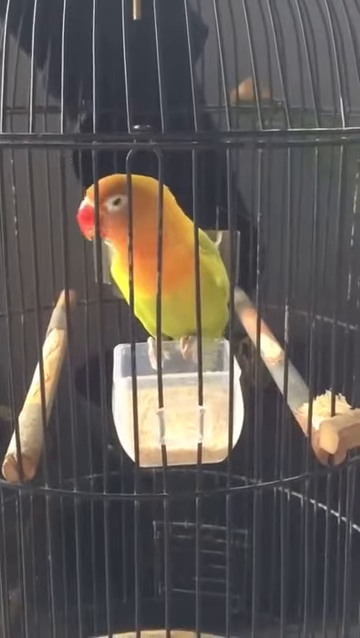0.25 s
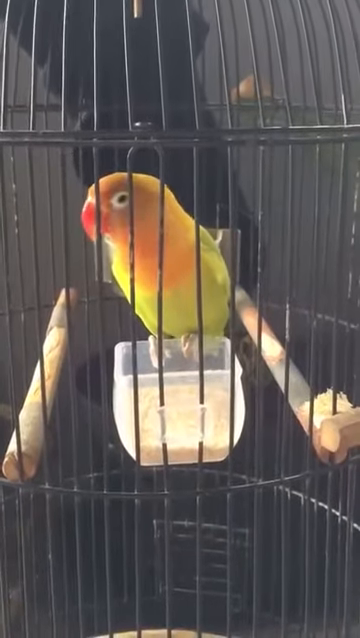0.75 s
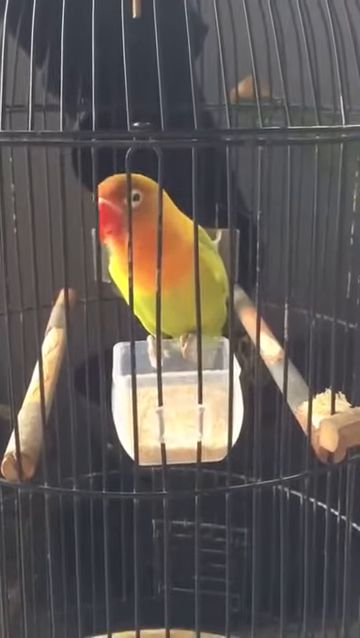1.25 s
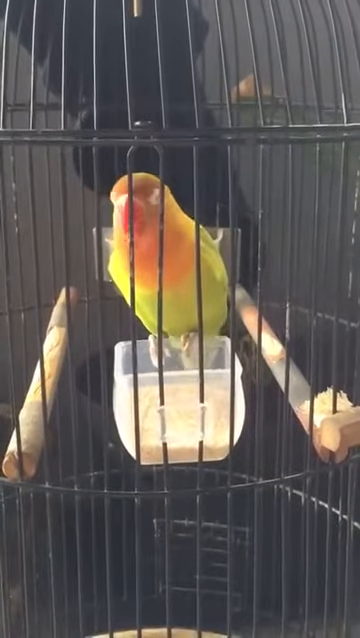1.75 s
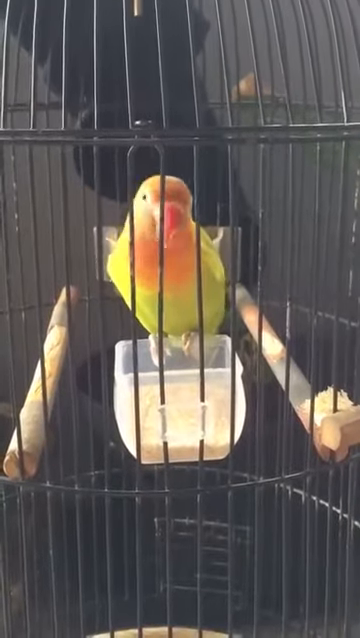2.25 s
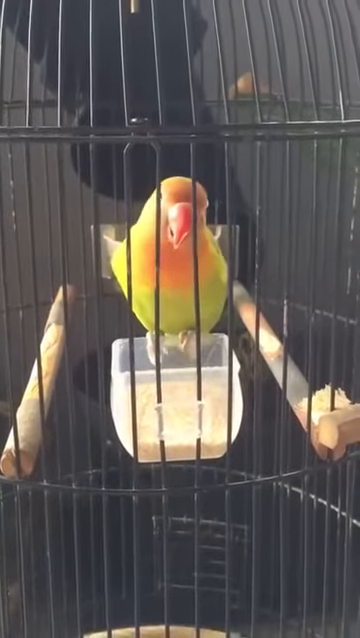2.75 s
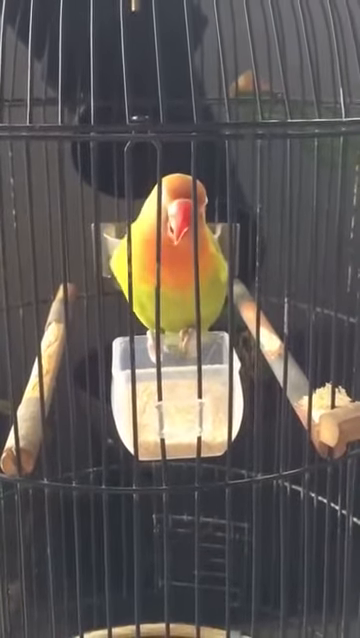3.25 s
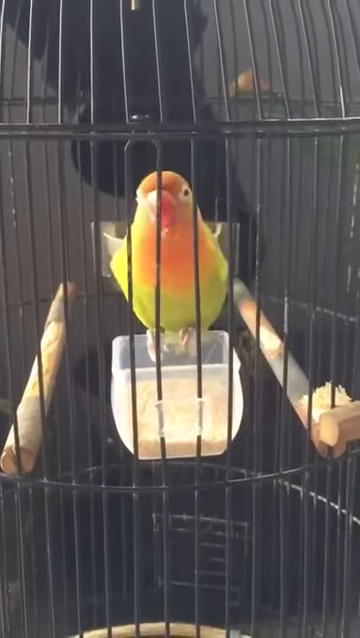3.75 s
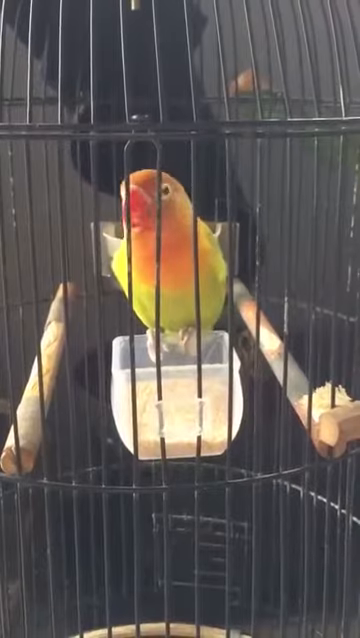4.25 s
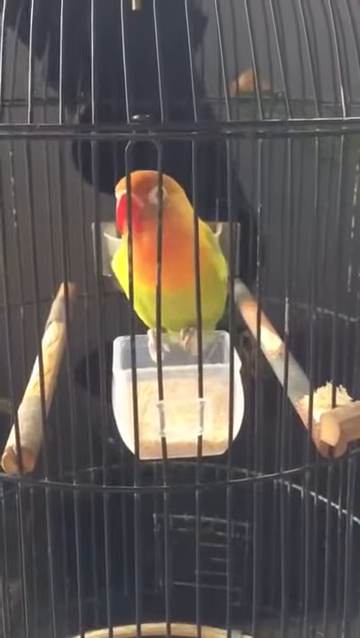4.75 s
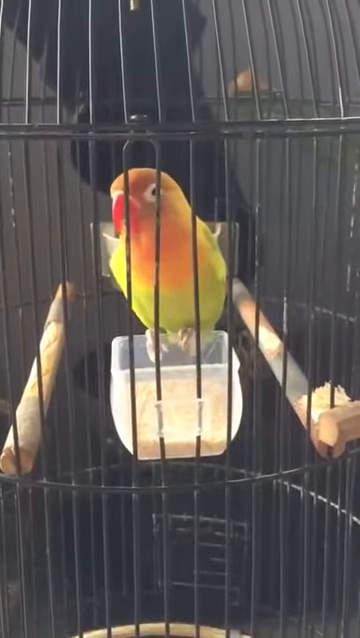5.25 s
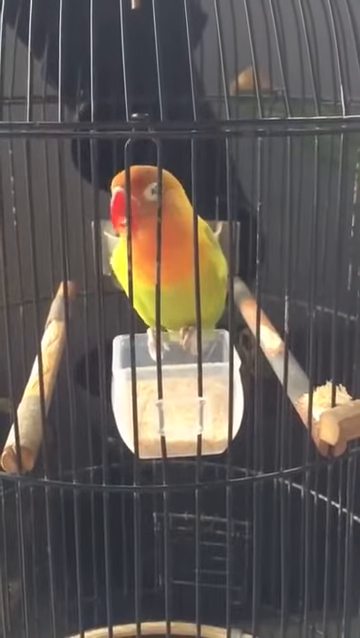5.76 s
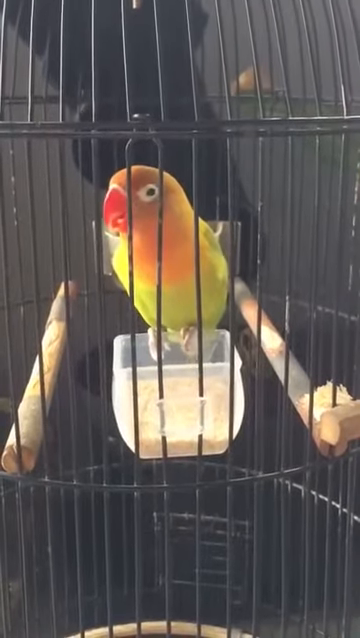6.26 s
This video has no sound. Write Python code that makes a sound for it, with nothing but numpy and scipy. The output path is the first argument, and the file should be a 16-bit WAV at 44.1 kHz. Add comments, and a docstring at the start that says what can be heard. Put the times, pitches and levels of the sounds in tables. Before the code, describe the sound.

A lovebird sings loud, high chirps close by, quickening into two-part notes, thinning to dry ticks and ending in harsh chatter.

```python
"""High, loud chirps from a lovebird in a wire cage, close up in a small room. They quicken into two-part
notes, thin out to dry ticks and end in harsh chatter. Each syllable is a vibrating membrane heard through
the throat: a lead note, a rough pitch break, then a main note. Under the song lie room noise, a faint hum,
a far bird and one soft scuff; the loudest notes overload the microphone."""
import sys
import numpy as np
from scipy import signal
from scipy.fft import rfft, irfft, next_fast_len
from scipy.io import wavfile
from scipy.ndimage import uniform_filter1d, minimum_filter1d, map_coordinates

SR = 44100
rng = np.random.default_rng(int(sys.argv[2]) if len(sys.argv) > 2 else 0)


def generate_wav(signal):
    """Clip the signal to [-1, 1] and save it as 16-bit WAV at the path in sys.argv[1]."""
    frames = np.transpose(np.atleast_2d(signal))
    scaled = np.clip(frames, -1, 1) * 32767
    pcm = np.round(scaled).astype(np.int16)
    wavfile.write(sys.argv[1], SR, pcm)


N = 287091

# Turbulence ringing in the windpipe and bill. Each row: frequency in Hz, relative level in dB.
BREATH_SPECTRUM = [(500, -27.5), (1000, -18.5), (1650, -21), (2200, 0), (3200, -3.5), (4000, -0.5),
                   (5500, -1.5), (7400, -13), (8300, 2), (9100, -12.5), (10200, 3.5), (11400, -21),
                   (12700, 3.5), (14000, 0.5), (15500, -15)]


def amp(db):
    """Decibels to gain."""
    return 10 ** (np.asarray(db) / 20)


def unit(x):
    """Scale to rms 1."""
    return x / np.sqrt(np.mean(x ** 2) + 1e-20)


def along(points, hz):
    """Read (Hz, value) points on a log frequency axis."""
    f, v = np.transpose(points)
    return np.interp(np.log(hz + 1), np.log(f + 1), v)


def filtered(x, response):
    """Equalise x with a gain given as a function of Hz."""
    m = next_fast_len(len(x) + 4096)
    return irfft(rfft(x, m) * response(np.fft.rfftfreq(m, 1 / SR)), m)[:len(x)]


def noise(spectrum, size):
    """Coloured noise of rms 1."""
    return unit(filtered(rng.standard_normal(size), lambda hz: amp(along(spectrum, hz))))


def wobble(rate, size):
    """A smooth random curve, rate knots a second."""
    return map_coordinates(rng.standard_normal(int(size * rate / SR) + 4), [np.arange(size) * rate / SR])


def add(track, s, x):
    """Mix x into the track at s seconds."""
    part = track[max(round(s * SR), 0):][:len(x)]
    part += x[:len(part)]


def drift(s, notes, first, last):
    """The value at time s of a steady drift from a phrase's first note to its last."""
    return np.interp(s, [notes[0][0], notes[-1][0]], [first, last])


def glide(hz, semitones):
    """Middle and end pitch of a note that slides through hz."""
    return hz * 2 ** (np.array([-.5, .5]) * semitones / 12)


def room(x, wet_db=-14, walls_db=-7, reflections=12):
    """Direct sound, early reflections from cage and wall, and a short diffuse tail."""
    # Reverb decay. Each row: frequency in Hz, seconds to fall 60 dB.
    decay = [(300, 0.081), (3000, 0.55), (6000, 0.43), (14000, 0.38)]
    # The bill aims its treble past the microphone, so the room answers brighter than the direct sound.
    # Each row: frequency in Hz, gain in dB.
    colour = [(1500, 2), (4000, 2), (6500, 0.5), (9000, 3.5), (10300, 4.5), (12500, 1), (14000, -2.5),
              (15500, -9)]
    hz, t, spectra = signal.stft(rng.standard_normal(SR * 3 // 5), SR, nperseg=256)
    tail_db = along(colour, hz)[:, None] - 60 * t / along(decay, hz)[:, None]
    tail = signal.istft(spectra * amp(tail_db), SR, nperseg=256)[1]
    response = amp(wet_db) * tail / np.linalg.norm(tail)
    delays = (np.geomspace(.0004, .012, reflections) * rng.uniform(.7, 1, reflections) * SR).astype(int)
    response[delays] += amp(walls_db) * rng.choice([-1, 1], reflections) / np.sqrt(reflections)
    response[0] += 1
    return signal.fftconvolve(x, response)


def room_tone(hum_trim_db=-2, hum_waver_db=3.5):
    """Low room noise and an unsteady hum swell and sink together."""
    # Fader ride of the room noise. Each row: time in seconds, level in dB.
    ride = [(0, -63.5), (2.4, -65), (3.3, -69.5), (4.2, -62.5), (5, -54.5), (6.5, -53.5)]
    # Hum tones and noise colour. Each row: frequency in Hz, relative level in dB.
    hum_tones = [(59.2, -58.5), (156.1, -60.5)]
    air_spectrum = [(20, -10), (70, -3), (170, -5), (320, -18.5), (1500, -21), (8000, -30.5),
                    (15000, -25.5)]
    t = np.arange(N) / SR
    level_db = np.interp(t, *np.transpose(ride))
    hum = np.zeros(N)
    for hz, db in hum_tones:
        peak = np.sqrt(2) * amp(db + hum_waver_db * wobble(4.5, N))
        hum += peak * np.sin(2 * np.pi * hz * t + .5 * wobble(6.1, N))
    return amp(level_db) * noise(air_spectrum, N) + amp(level_db - level_db.max() + hum_trim_db) * hum


def scuff(start=5.372, level_db=-37, rise_s=.0017, t60=.36):
    """A soft, dull scuff: a burst of dark noise that dies away."""
    # The scuff's colour. Each row: frequency in Hz, relative level in dB.
    spectrum = [(150, -15), (450, 0), (1200, -5), (3000, -51)]
    out, t = np.zeros(N), np.arange(SR // 2) / SR
    envelope = amp(level_db - 60 * t / t60) * (1 - np.exp(-t / rise_s))
    add(out, start, envelope * noise(spectrum, len(t)))
    return out


def far_bird(wet_db=7, waver=.05):
    """Strongly wavering glides, heard mostly through the room."""
    # Whistles. Each row: start and length in seconds, first and last pitch in Hz, level in dB.
    calls = [(1.07, 0.084, 3640, 3120, -42.5), (1.115, 0.11, 2766, 2395, -41),
             (5.544, .17, 1328, 1670, -47.5), (5.644, 0.068, 3100, 3440, -40.5)]
    out = np.zeros(N)
    for s, length, start_hz, end_hz, db in calls:
        size = int(length * SR)
        pitch = np.linspace(start_hz, end_hz, size) * (1 + waver * wobble(277, size))
        whistle = np.hanning(size) * np.sin(2 * np.pi * np.cumsum(pitch) / SR)
        add(out, s, room(amp(db - wet_db) * whistle, wet_db))
    return out


def chirp_tail(gain_db=1):
    """The room still rings from a chirp sung just before the scene opens."""
    _, chirp = next(chirps())
    out = np.zeros(N)
    add(out, 0, amp(gain_db) * room(chirp)[int(.15 * SR):])
    return out


def beak_clicks(t60=.0075, trim_db=-3):
    """Tiny snaps of the bill between the calls."""
    # Snaps. Each row: start in seconds, relative level in dB.
    snaps = [(5.1173, -43), (5.442, -25.5), (5.5227, -19.5), (5.6845, -22)]
    out, t = np.zeros(N), np.arange(SR // 20) / SR
    for s, db in snaps:
        add(out, s, room(amp(db + trim_db - 60 * t / t60) * noise(BREATH_SPECTRUM, len(t))))
    return out


def syrinx(pitch, fall_db, octave_db, rasp, trill, trill_hz=260, jitter=.09, flutter=.32, split=.32):
    """A fast-trilling membrane heard through the throat; rasp shakes pitch and level and adds breath."""
    # Resonances of the throat and open beak. Each row: frequency in Hz, gain in dB.
    throat = [(1600, -49), (1950, -12), (2300, -4.5), (3200, 2.5), (4200, -1), (5400, 1.5), (6500, 5.5),
              (7400, -10.5), (8400, -8), (9200, -17), (10300, -10), (11200, -15), (12500, -7),
              (13800, -16.5), (15500, -20)]
    size = len(pitch)
    trill_cycles = np.cumsum(trill_hz * (1 + wobble(150, size) / 5)) / SR + rng.random()
    swing = trill * np.sin(2 * np.pi * trill_cycles) + jitter * rasp * wobble(1521, size)
    phase = 2 * np.pi * np.cumsum(pitch * (1 + swing)) / SR
    harmonic = np.arange(1, 8)[:, None]
    partials = amp(along(throat, harmonic * pitch) - fall_db * np.log2(harmonic)
                   + octave_db * (harmonic == 2))
    partials /= 1 + (harmonic * pitch / 15000) ** 40  # the highest overtones fade out
    partials /= np.sqrt(np.sum(partials ** 2, axis=0) / 2)
    tone = np.sum(partials * np.sin(harmonic * phase), axis=0)
    tone *= 1 + flutter * rasp * wobble(1160, size)
    # At the top of its range the membrane repeats only every third cycle, adding hollow undertones.
    thirds = (pitch > 5800) * (np.cos(phase / 3) + np.cos(2 * phase / 3))
    tone *= 1 + split * rasp * thirds
    breath = .5 * rasp * noise(BREATH_SPECTRUM, size)
    return (tone + breath) / np.sqrt(1 + rasp ** 2)


def syllable(gesture, voice, lead_s, length, lead_hz, middle_hz, end_hz, lead_db, main_db, lead_slope=0):
    """A gesture stretched and bent through three pitches; stage 0-1 is the lead, 1-2 the main note."""
    # A voice: overtone roll-off of lead and main note in dB per octave, the main note's second-partial
    # boost in dB, rasp of lead and main note from 0 to 1, trill depth as a share of the pitch.
    lead_fall, main_fall, octave_db, lead_rasp, main_rasp, trill = voice
    t = np.arange(int(length * SR)) / SR
    stage = np.interp(t, [0, lead_s, length], [0, 1, 2])

    def by_note(lead, main):
        """Crossfade a setting across the pitch break."""
        return np.interp(stage, [.9, 1.1], [lead, main])

    knots, knot_hz, knot_db = np.transpose(gesture)
    anchors = [.6, 1.45, 1.8]  # stages of the lead, middle and end pitch
    bend = np.array([lead_hz, middle_hz, end_hz]) / np.interp(anchors, knots, knot_hz)
    pitch = np.interp(stage, knots, knot_hz)
    # Just after the break, at stage 1.15, the gesture keeps its own pitch.
    pitch *= np.interp(stage, np.insert(anchors, 1, 1.15), np.insert(bend, 1, 1))
    pitch *= 2 ** (by_note(lead_slope, 0) * (stage - anchors[0]) / 12)  # slope in semitones
    # The voice is rough while the membrane starts up and again where its pitch breaks.
    onset_rasp = .3 * np.exp(-t / .0028)
    break_rasp = .28 * np.exp(-np.abs(t - lead_s) / .0024)
    rasp = np.clip(by_note(lead_rasp, main_rasp) + onset_rasp + break_rasp, 0, 1)
    tone = syrinx(pitch, by_note(lead_fall, main_fall), by_note(0, octave_db), rasp, trill)
    gate = np.clip(np.minimum(t, length - t) / .00153, 0, 1)
    level_db = np.interp(stage, knots, knot_db) + by_note(lead_db, main_db)
    return gate * amp(level_db) * tone


def chirps():
    """Loud single chirps: a high flick, then a whistle that bends to its own end pitch."""
    # The chirp's contour. Each row: stage, pitch in Hz, level in dB.
    gesture = [(0, 6395, -7), (.5, 6494, -4.5), (.8, 6100, 0.5), (1.05, 5030, -3), (1.17, 5700, 3.5),
               (1.7, 5510, 1.5), (2, 5620, -2)]
    # A nearly pure voice; settings as listed in syllable.
    voice = (19, 17, -2, 0.06, 0.03, 0.018)
    # Each row: start and length in seconds, end pitch in Hz, main-note gain in dB.
    notes = [(0.095, 0.032, 5690, -8.5), (.326, 0.04, 5495, -7), (.569, 0.035, 6060, -6.5),
             (.774, 0.031, 5890, -7), (.97, .028, 5300, -5), (1.182, 0.0343, 5164, -6),
             (1.367, .035, 5200, -8.5)]
    for s, length, end_hz, db in notes:
        yield s, syllable(gesture, voice, lead_s=.0095, length=length, lead_hz=drift(s, notes, 6174, 5940),
                          middle_hz=5490, end_hz=end_hz, lead_db=-7, main_db=db)


def cheeps():
    """A low lead note appears before the whistle; both slowly lengthen and sink."""
    # The cheep's contour. Each row: stage, pitch in Hz, level in dB.
    gesture = [(0, 2450, 2), (.5, 2850, 4), (.88, 3100, 5), (1, 5930, 1.5), (1.08, 4833, -7),
               (1.7, 5440, -1), (2, 5930, -9)]
    # A bright, trilled voice; settings as listed in syllable.
    voice = (3, 8, -1, .22, .13, .03)
    # Each row: start in seconds, glide in semitones, main-note gain in dB.
    notes = [(1.542, 0.36, -3.5), (1.694, 0.54, -4.5), (1.839, 0.43, -6), (1.979, 1.3, -6),
             (2.113, 0.49, -7), (2.25, .2, -8), (2.382, 1.48, -7.5), (2.509, 0.67, -6.5),
             (2.646, 0.41, -8.5), (2.782, 1.33, -8), (2.913, -1.24, -9.5)]
    for s, semitones, db in notes:
        lead_s, length = drift(s, notes, .0075, .0115), drift(s, notes, .0424, .0506)
        lead_hz, main_hz = drift(s, notes, 3114, 2584), drift(s, notes, 5300, 5270)
        yield s, syllable(gesture, voice, lead_s, length, lead_hz, *glide(main_hz, semitones),
                          lead_db=-19.5, main_db=db)


def yodels(main_s=.025):
    """A held low note flips up to a short high one; the two close in on each other."""
    # The yodel's contour. Each row: stage, pitch in Hz, level in dB.
    gesture = [(0, 2140, -8.5), (.3, 2392, -1), (.97, 2420, 2), (1.05, 5840, -1), (1.35, 5250, 2.5),
               (1.7, 4850, 1), (2, 4890, -0.5)]
    # A bright, husky voice; settings as listed in syllable.
    voice = (4, 6, 0, .17, .24, .005)
    # Each row: start and lead length in seconds, lead pitch in Hz, main-note gain in dB.
    notes = [(3.037, 0.021, 2210, -13.5), (3.144, 0.031, 2187, -16), (3.259, 0.03, 2123, -12.5),
             (3.38, 0.032, 2245, -14.5), (3.499, .035, 2674, -15.5), (3.616, 0.036, 2594, -15.5),
             (3.736, 0.035, 2814, -17)]
    for s, lead_s, lead_hz, db in notes:
        high_hz = 5060 - 1.15 * (lead_hz - 2198)  # sinks as the low note rises
        yield s, syllable(gesture, voice, lead_s, lead_s + main_s, lead_hz, *glide(high_hz, -.25),
                          lead_db=-17.5, main_db=db, lead_slope=drift(s, notes, 1.27, -2.15))


def stairs(lead_s=.033):
    """Two steps up and a slide down, each syllable a little lower than the one before."""
    # The stair's contour. Each row: stage, pitch in Hz, level in dB.
    gesture = [(0, 2052, -16.5), (.28, 1955, -5), (.42, 3590, -4), (.97, 3900, 2), (1.06, 6200, -5),
               (1.3, 5900, -11), (1.5, 4560, -3), (2, 4110, -3.5)]
    # A raspy voice; settings as listed in syllable.
    voice = (13.2, 8.2, 1.7, 0.29, 0.23, 0.0054)
    # Each row: start and length in seconds, main-note gain in dB.
    notes = [(3.851, .048, -6), (3.963, .049, -7), (4.074, .052, -6), (4.186, 0.062, -8),
             (4.307, .059, -5.5), (4.427, 0.064, -8.5), (4.55, 0.06, -9.5)]
    # Longer stairs sink further by mid-note. Each row: length in seconds, middle pitch in Hz.
    sag = [(.048, 5650), (.06, 4270)]
    for s, length, db in notes:
        lead_hz, end_hz = drift(s, notes, 3900, 3440), drift(s, notes, 4476, 4138)
        middle_hz = np.interp(length, *np.transpose(sag))
        yield s, syllable(gesture, voice, lead_s, length, lead_hz, middle_hz, end_hz,
                          lead_db=-12.5, main_db=db, lead_slope=drift(s, notes, 1.46, -2.14))


def slurs(lead_s=.01, length=.0361, lead_hz=3100, main_hz=3850):
    """A quick scoop up into a held note."""
    # The slur's contour. Each row: stage, pitch in Hz, level in dB.
    gesture = [(0, 2147, 1), (1.1, 4250, 2), (1.35, 3850, 5.5), (2, 3700, 4.5)]
    # A slightly hoarse voice; settings as listed in syllable.
    voice = (12.5, 8, 3, 0, 0.2, 0.01)
    # Each row: start in seconds, glide in semitones, gain in dB.
    notes = [(4.674, 0.14, -16), (4.778, -0.52, -17)]
    for s, semitones, db in notes:
        yield s, syllable(gesture, voice, lead_s, length, lead_hz, *glide(main_hz, semitones), db, db)


def ticks(hz=2170):
    """Calls so short they sound like dry ticks, all on one low pitch."""
    # The tick's contour. Each row: stage, pitch in Hz, level in dB.
    gesture = [(0, 2770, 0), (1, 2134, 0.65), (2, 2030, 0)]
    # A voice full of overtones; settings as listed in syllable.
    voice = (1, 1, 1, 0.1, 0.02, 0.025)
    # Each row: start and length in seconds, gain in dB.
    notes = [(4.977, .0069, -18.5), (5.063, .0056, -16.5), (5.142, 0.0047, -17), (5.22, 0.0083, -14),
             (5.306, 0.0094, -15.5), (5.386, 0.0074, -21), (5.467, 0.0077, -16), (5.544, 0.0092, -14),
             (5.63, 0.0094, -13), (5.71, 0.0087, -13.5)]
    for s, length, db in notes:
        yield s, syllable(gesture, voice, length / 2, length, hz, hz, hz, db, db)


def squawks(lead_hz=4810, end_hz=2060):
    """The ticks grow into falling buzzy notes with an ever longer harsh start."""
    # The squawk's contour. Each row: stage, pitch in Hz, level in dB.
    gesture = [(0, 4920, -15), (.55, 4840, -17.5), (1, 2557, -17), (1.35, 2310, 0), (2, 1960, -7.5)]
    # A buzzy voice with a rough lead; settings as listed in syllable.
    voice = (6, 3, -2, .45, .06, .005)
    # Each row: start in seconds, lead and main-note gain in dB.
    notes = [(5.778, 10, -7.5), (5.866, 5.5, -9), (5.955, 10, -9)]
    for s, lead_db, main_db in notes:
        lead_s, length = drift(s, notes, .0032, .012), drift(s, notes, .028, .032)
        middle_hz = drift(s, notes, 2080, 2187)
        yield s, syllable(gesture, voice, lead_s, length, lead_hz, middle_hz, end_hz, lead_db, main_db)


def zigzags(accent_db=5.5):
    """An accented high flick drops an octave and climbs again."""
    # The zigzag's contour. Each row: stage, pitch in Hz, level in dB.
    gesture = [(0, 4510, -1.5), (.4, 5120, -0.5), (.75, 5840, 3), (1.1, 2816, -6.5), (1.25, 2502, 2.5),
               (1.7, 3070, 5), (2, 3100, -4.5)]
    # A harsh, deeply trilled voice; settings as listed in syllable.
    voice = (14, 0, 6, 0.1, 0.03, 0.064)
    # Each row: start and length in seconds, gain in dB.
    notes = [(6.049, 0.034, -9), (6.142, .035, -12.5), (6.234, 0.036, -13), (6.326, .035, -12.5),
             (6.424, 0.032, -14)]
    for s, length, db in notes:
        yield s, syllable(gesture, voice, lead_s=.009, length=length, lead_hz=5960,
                          middle_hz=2619, end_hz=3053, lead_db=db + accent_db, main_db=db)


def lovebird():
    """The song: eight phrases in turn, each syllable with close reflections and a short room ring."""
    song = np.zeros(N)
    for phrase in (chirps, cheeps, yodels, stairs, slurs, ticks, squawks, zigzags):
        for s, sound in phrase():
            add(song, s, room(sound))
    return song


def scene():
    """Bird, room and background at one microphone."""
    return (lovebird() + chirp_tail() + beak_clicks() + far_bird() + scuff() + room_tone())[None]


def record(dry, lopsided=.015, sputter_hz=600, sputter_db=-30, top_hz=15950):
    """A fast limiter holds loud notes at full scale; they still swing lopsidedly and sputter in the bass."""
    x = dry[0]
    needed_gain = 1 / np.maximum(np.abs(x), 1)
    x = x * uniform_filter1d(minimum_filter1d(needed_gain, size=32), size=32)
    overload = amp(sputter_db) * np.abs(uniform_filter1d(x ** 4, size=64))
    sputter = unit(filtered(rng.standard_normal(N), lambda hz: 1 / (1 + (hz / sputter_hz) ** 2)))
    x = x + lopsided * x ** 2 + overload * sputter
    return filtered(x, lambda hz: np.clip((top_hz - hz) / 200, 0, 1))[None]


dry = scene()
out = record(dry)
generate_wav(out)
```